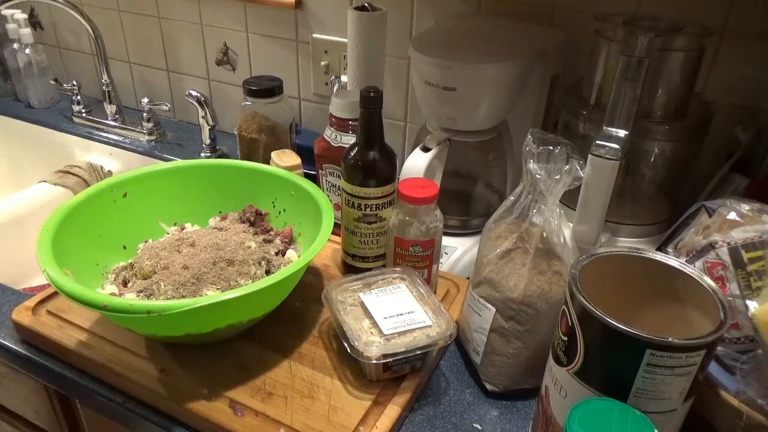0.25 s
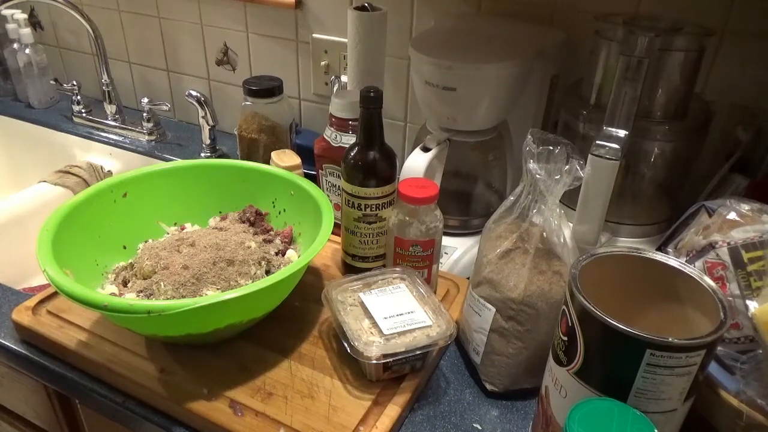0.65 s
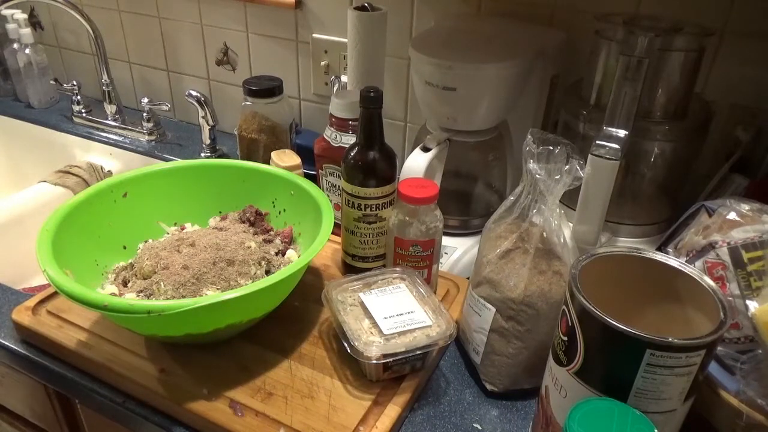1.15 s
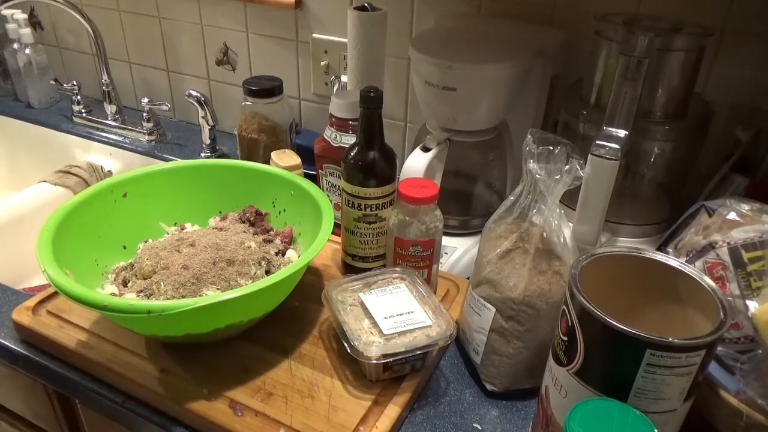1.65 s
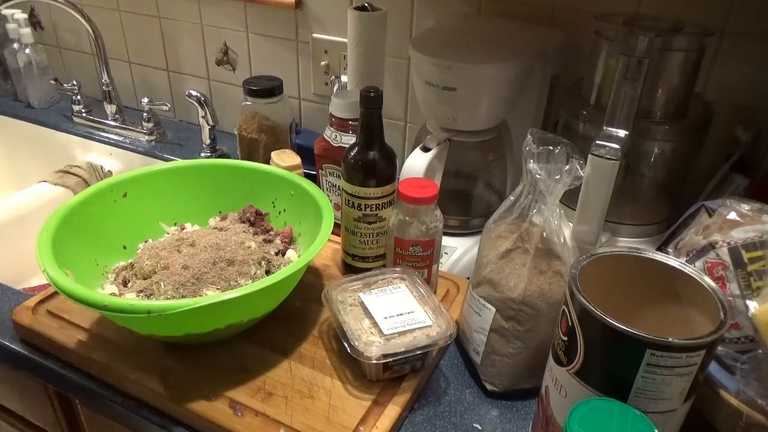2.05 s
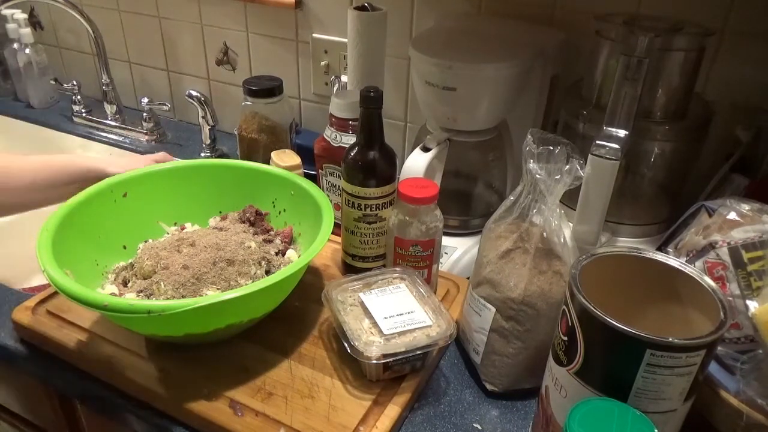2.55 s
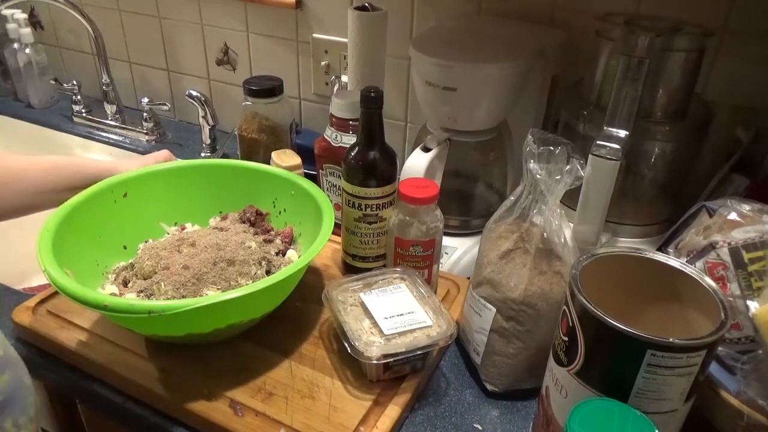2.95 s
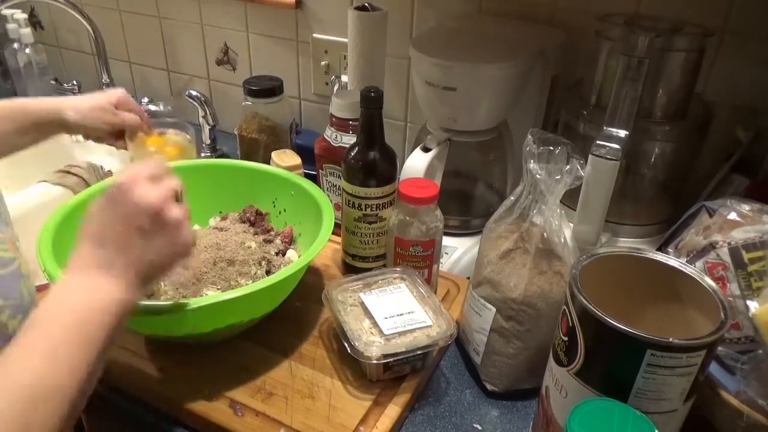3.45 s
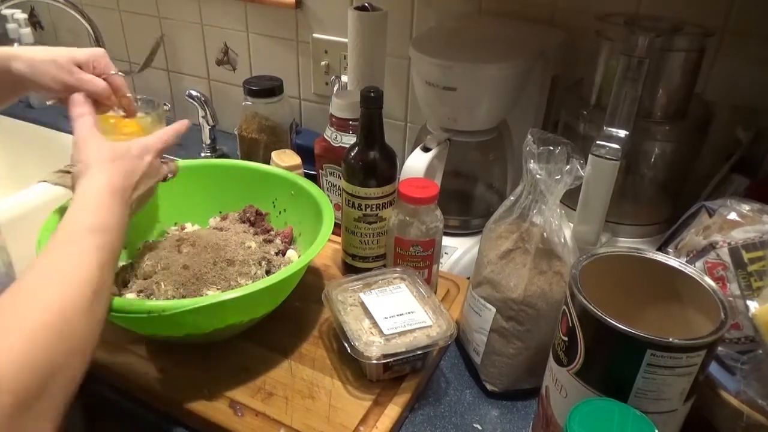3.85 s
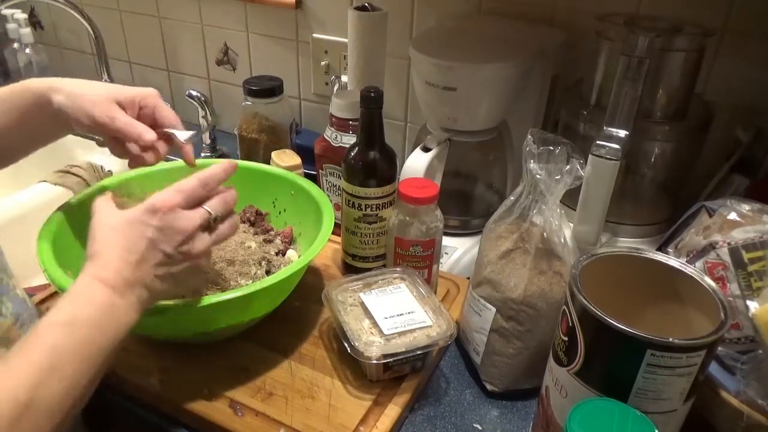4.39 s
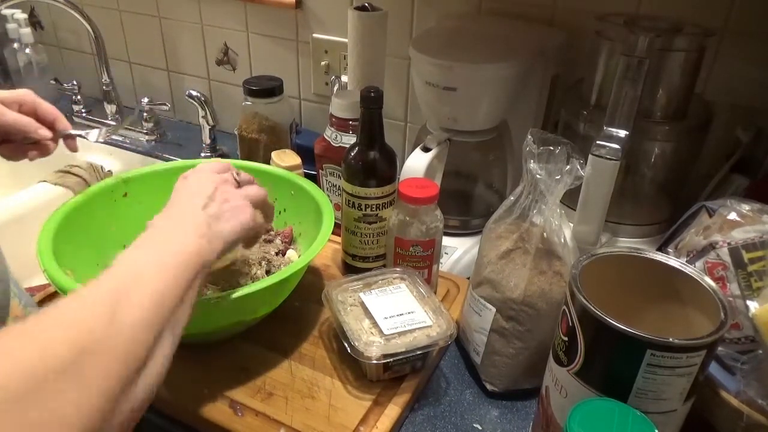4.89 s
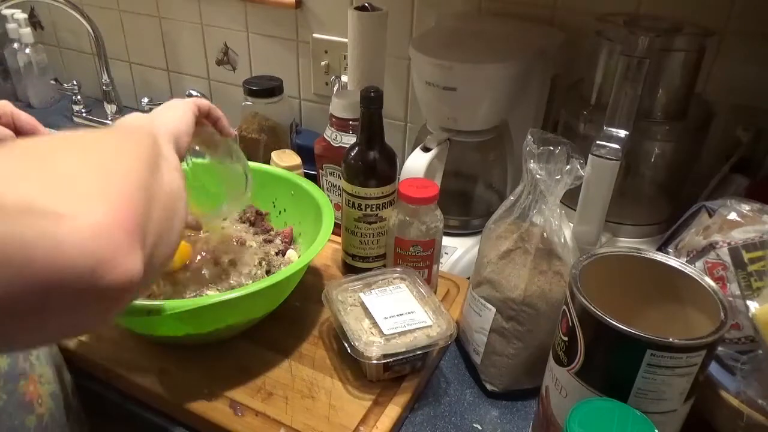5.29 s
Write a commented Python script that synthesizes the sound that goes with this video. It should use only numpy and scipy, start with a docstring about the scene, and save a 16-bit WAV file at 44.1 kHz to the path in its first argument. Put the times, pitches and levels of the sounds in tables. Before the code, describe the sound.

Over a steady appliance hum, a drawer of loose metal scrapes and slams, a bowl is knocked, glass clinks, and eggs plop into the mixture.

```python
"""Drawer and mixing bowl in a kitchen

An appliance hums throughout: shaped noise and a few unsteady tones. Out of sight a drawer rumbles and scrapes
on its runners, made of tiny random contacts; loose metal rattles in it, and it bumps shut.
Things knock against a plastic mixing bowl on a wooden board, and a spoon clinks in a glass dish of eggs:
both are ringing tones plus a noisy tick. The eggs are tipped into the bowl with a wet slap, a swarm of clicks."""
import sys
import numpy as np
from scipy import signal
from scipy.fft import rfft, irfft, next_fast_len
from scipy.io import wavfile
from scipy.ndimage import uniform_filter1d, map_coordinates

SR = 44100
rng = np.random.default_rng(int(sys.argv[2]) if len(sys.argv) > 2 else 0)


def wrap_up_sound(samples):
    """Save the sound to the file named by the first command line argument, as 16-bit audio."""
    columns = np.atleast_2d(samples).T
    # keep every value between -1 and 1, then stretch to whole-number steps
    tamed = np.clip(columns, -1, 1)
    steps = np.round(tamed * 32767).astype(np.int16)
    wavfile.write(sys.argv[1], SR, steps)


N = 243873  # length of the scene [samples]

# In these tables t60 is the time to fade by 60 dB. Spectra give only the balance between frequencies.
# noise of the appliance: (frequency [Hz], level [dB per Hz])
AIR_SPECTRUM = [(12, -58.5), (20, -9), (48, -31), (120, -6), (161, -8.5), (199, -1), (375, -7.5),
                (557, -7.5), (850, -15.5), (920, -10), (996, -19), (1200, -19), (1370, -22.5), (1780, -25),
                (11000, -38), (14300, -101), (22000, -120)]
AIR_DB = -44.78  # level before the sideways sound is added
# tones of the appliance, before their slow growth: (frequency [Hz], level [dB rms])
HUM_TONES = [(59.5, -63), (218, -52.5), (474, -54.5), (942, -53.5)]
# the tones grow a little louder: (time [s], level change [dB])
HUM_GROWTH = [(2.3, -2.5), (3.6, 0)]

# how wide the all-around sound is: (frequency [Hz], side minus middle [dB])
STEREO_WIDTH = [(60, -15), (110, -22), (190, -24.5), (340, -17.5), (600, -12.5), (1060, -6.5), (1880, -6.5),
                (3350, -6), (5950, -3.5), (10600, -11)]
# how long the kitchen echoes: (frequency [Hz], t60 [s])
KITCHEN_DECAY = [(200, 0.32), (550, 0.59), (1400, 0.4), (3700, 0.32), (10000, 0.4)]
TOP_HZ = 11120  # the final sound stops about here

# soft rubs and wet slaps: (time [s], level [dB], hold [s], t60 [s], half the 3 dB treble cutoff [Hz])
SMEAR_EVENTS = [(2.668, -45.5, 0.074, 0.09, 9000), (3.301, -49.5, 0.055, 0.33, 6100),
                (3.411, -46.5, 0.046, 0.071, 9500), (4.214, -58.5, 0.18, .2, 4500),
                (4.729, -47.5, 0.0096, 0.16, 9000), (4.788, -44, 0.0089, 0.17, 9000),
                (4.953, -53, 0.019, .1, 10000), (5.083, -38.5, 0.013, 0.2, 7000),
                (5.363, -30, 0.02, 0.22, 5800)]
# colour of a rub or slap: (frequency [Hz], level [dB per Hz])
SMEAR_SPECTRUM = [(240, -10.5), (400, -7), (506, -11), (580, -2), (659, -17), (747, -0.5), (907, -10.5),
                  (2170, -4.5), (2710, -4.5), (2990, -8.5), (3890, -7), (6870, -16), (11000, -16.5),
                  (14300, -49), (22000, -120)]

# spoon on glass: (time [s], ring peak [dB], strongest frequency [Hz], tick before halving, re ring [dB])
CLINK_EVENTS = [(3.659, -36, 2860, -13), (4.264, -43, 3000, -21), (4.615, -35, 2400, -6.5),
                (4.9822, -20, 3300, -8), (4.987, -20.5, 2470, -4.5), (5.257, -31.5, 2980, -11.5)]
# ringing of the glass dish: (frequency [Hz], level [dB], t60 [s])
GLASS_MODES = [(2380, -17.5, 0.071), (2503, 0, 0.06), (2615, 10, 0.016), (2885, 1, 0.032), (3120, 3, 0.03),
               (3450, -1, 0.05), (3440, -34, 0.073), (5130, 10, .07), (5782, 4, 0.051), (8021, 10, .07)]
# colour of the spoon's tick: (frequency [Hz], level [dB per Hz])
TICK_SPECTRUM = [(1200, -32), (2300, 15), (3500, 3.5), (5500, 2), (8000, -2), (11000, -7)]

# hard contacts on bowl and board: (time [s], first ring peak [dB], strongest frequency [Hz], rebound after [s],
# crack before its 0.57 gain, re first ring [dB], crack t60 [s], crack top frequency [Hz])
KNOCK_EVENTS = [(2.568, -27, 750, .0045, 10, 0.023, 8800), (2.663, -42, 1290, .005, 12.5, 0.13, 10300),
                (2.712, -26, 1040, 0.0051, 5, 0.056, 6800), (2.745, -26.5, 730, 0.0082, -3.5, 0.052, 4030),
                (2.84, -30.5, 900, .005, 3.5, 0.058, 6600), (3.071, -15.5, 980, 0.0034, -1.5, 0.033, 6900),
                (3.1786, -18, 630, 0.00604, -4.5, 0.024, 2240),
                (3.425, -26.5, 1430, 0.00283, -6, 0.021, 9200), (3.447, -32, 1400, .005, -13, 0.044, 9000),
                (3.465, -27, 1100, .005, -8, 0.043, 9100)]
# ringing of the bowl on its board: (frequency [Hz], level [dB], t60 [s])
BOWL_MODES = [(238, -5, 0.04), (290, -0.5, 0.081), (453, 6, 0.062), (522, 0, 0.057), (743, 2, 0.044),
              (900, 13, 0.019), (1080, 8, 0.01), (1367, -11, 0.036), (1450, -0.5, 0.017),
              (2400, -20, 0.018)]
# colour of a hard contact: (frequency [Hz], level [dB per Hz])
CRACK_SPECTRUM = [(100, 2.5), (600, 3), (1400, 3), (2300, 4), (4300, 1), (7000, -7.5), (9700, 1.5),
                  (11200, -0.5)]
REBOUND_DB = 3  # a knock lands twice; the second contact relative to the first
SETTLE_S, SETTLE_DB, SETTLE_HZ = 0.025, -7.5, 267  # then the bowl settles on its board with a lower bump

# brief squeaks of sliding surfaces: (time [s], length [s], frequency [Hz], level before the swell [dB rms])
SQUEAK_EVENTS = [(1.06, 0.049, 7610, -30.5), (1.172, 0.089, 8770, -48), (1.592, .07, 3850, -33),
                 (1.67, 0.048, 3900, -40), (3.41, 0.029, 1480, -38.5), (4.948, 0.041, 8400, -51)]

# the drawer catches, and its load shifts after the stop:
# (time [s], thump peak [dB], clack level before fading [dB rms], clack top frequency [Hz])
BUMP_EVENTS = [(0.718, -50, -32.5, 12000), (0.82, -35, -30, 5000), (0.922, -26, -22.5, 2240),
               (1.021, -36, -27, 1820), (1.28, -32, -35, 3500), (1.322, -45, -24, 7600),
               (1.574, -50, -29, 11100), (1.783, -17, -16, 4500), (1.884, -22.5, -25.5, 2500),
               (1.976, -35, -22.5, 4550), (2.237, -41, -35, 1240)]
# low ringing of the cabinet: (frequency [Hz], level [dB], t60 [s])
CABINET_MODES = [(76, -9, 0.16), (100, -11, 0.16), (235, 4, 0.064), (300.4, 0, 0.054), (434, -4.5, 0.044),
                 (589, -7, 0.046), (1022, -7, 0.1)]
SLAM_S, SLAM_THUMP_DB, SLAM_CLACK_DB, SLAM_TOP_HZ = 1.799, -10.5, -24, 2500  # the drawer hits its stop
SLAM_REPEAT_S, SLAM_LOSS_DB = 0.022, 3  # and chatters against it, weaker each time

# colour of the runners' rumble: (frequency [Hz], level [dB per Hz])
RUMBLE_SPECTRUM = [(21, -41.5), (35, -20), (150, -20.5), (220, -4.5), (292, -4.5), (394, -7.5), (474, -4),
                   (533, -17), (577, -5), (616, -27), (800, -10.5), (1040, -42), (1760, -120)]
# colour of the scraping: (frequency [Hz], level [dB per Hz])
SCRAPE_SPECTRUM = [(320, -24), (550, -5.5), (612, -3), (695, -1), (927, -2.5), (1010, 0.5), (1220, -1),
                   (1330, 1.5), (1700, 3), (1970, -2), (4240, -5.5), (5360, -9.5), (6230, -17),
                   (7000, -18.5), (9100, -23), (15400, -120)]
# colour of the metal's chatter: (frequency [Hz], level [dB per Hz])
CHATTER_SPECTRUM = [(3240, -21), (5500, -11.5), (6200, -4.5), (7020, -8), (7610, -3.5), (9140, -3),
                    (9720, -2), (9890, -2), (10300, -2.5), (10600, 7), (11000, -6.5), (14300, -45),
                    (22000, -120)]
# ringing of the loose metal: (frequency [Hz], width [Hz], level [dB])
METAL_MODES = [(1696, 21, -4.5), (4260, 120, -6), (6170, 26, -2.5), (7570, 105, -5), (9700, 33, -35),
               (10220, 24, 7), (10260, 10.5, 1), (10250, 31, -0.5)]
# jerks of the drawer: (time [s], hold [s], rumble level [dB], scrape level [dB], rattle level [dB])
DRAWER_JERKS = [(-0.012, 0.012, -32.5, -29, -28), (0.192, 0.035, -44, -38.5, -40),
                (0.236, 0.017, -35.5, -27, -29.5), (0.266, 0.029, -33.5, -28.5, -41),
                (0.36, 0.043, -44, -35, -31.5), (0.405, 0.096, -56, -36.5, -26),
                (0.52, 0.063, -44, -31.5, -26.5), (0.706, 0.063, -51, -32.5, -26),
                (0.804, .1, -36, -30.5, -27), (0.923, 0.046, -35, -28.5, -25),
                (0.988, 0.043, -29.5, -29.5, -25.5), (1.039, 0.11, -62, -34, -27),
                (1.325, 0.0045, -40, -30, -49), (1.342, 0.078, -30, -38, -53.5),
                (1.579, .03, -35, -28.5, -30.5), (1.706, 0.08, -53, -38, -45),
                (1.78, 0.032, -20.5, -25, -32), (1.813, 0.11, -34.5, -27.5, -27.5),
                (1.985, 0.034, -43, -42, -37.5), (2.131, 0.011, -64, -46, -43)]
JERK_RISE_S = 0.019  # a jerk takes hold this fast
RUMBLE_T60, SCRAPE_T60, RATTLE_T60 = 0.15, 0.35, 0.3  # dying away after a jerk [s]
# the drawer gliding between jerks: (time [s], rumble level [dB])
DRAWER_GLIDE = [(0.0, -41), (0.45, -50), (0.7, -44), (1.1, -43.5), (1.42, -35.5), (1.72, -35), (2.08, -70),
                (2.28, -53), (2.56, -103)]
# scrape and rattle of a glide whose rumble is at the reference level
GLIDE_REF_DB, GLIDE_SCRAPE_DB, GLIDE_RATTLE_DB = -35.5, -42.5, -61.5
GLIDE_GROWTH = 0.41  # they rise by this many dB for each dB of rumble
JUDDER_DB = -0.06  # a very slight unsteadiness as the slide sticks and slips

AGE = np.arange(SR // 2) / SR  # time since a blow [s]


def amp(db):
    """Turn decibels into gain."""
    return 10 ** (np.asarray(db) / 20)


def unit(x):
    """Scale to an rms level of 1."""
    return x / np.sqrt(np.mean(x ** 2) + 1e-20)


def along(points, hz):
    """Read (Hz, value) points on a logarithmic frequency axis."""
    f, value = np.transpose(points)
    return np.interp(np.log(hz + 1), np.log(f + 1), value)


def wobble(rate):
    """A smooth random curve with this many new random points a second."""
    points = rng.standard_normal(int(N * rate / SR) + 4)
    return map_coordinates(points, [np.arange(N) * rate / SR])


def filtered(x, response):
    """Change each frequency of x by the response."""
    n = x.shape[-1]
    padded = next_fast_len(n + SR // 4)
    spectrum = rfft(x, padded) * response(np.fft.rfftfreq(padded, 1 / SR))
    return irfft(spectrum, padded)[..., :n]


def coloured(x, spectrum):
    """Shape x by a (Hz, dB) spectrum, at rms 1."""
    return unit(filtered(x, lambda hz: amp(along(spectrum, hz))))


def diffuse(pair):
    """Two unrelated signals become sound from all around at two close microphones."""
    middle = pair[0]
    side = filtered(pair[1], lambda hz: amp(along(STEREO_WIDTH, hz)))
    return np.array([middle + side, middle - side])


def add(track, s, sound):
    """Mix a sound into a track at time s."""
    part = track[..., round(s * SR):][..., :sound.shape[-1]]
    part += sound[..., :part.shape[-1]]


def ring(modes, weight=np.ones_like, scatter_db=-1.6):
    """Fading tones struck at slightly new strengths, each building up over about half a cycle; peak 1."""
    hz, db, t60 = np.transpose(modes)
    strength = amp(db + scatter_db * rng.standard_normal(len(hz))) * weight(hz)
    cycles = hz[:, None] * AGE
    build_up = 1 - np.exp(-2 * cycles)
    fade = amp(-60 * AGE / t60[:, None])
    x = strength @ (np.sin(2 * np.pi * cycles) * build_up * fade)
    return x / np.abs(x).max()


def favour(hz, centre_hz, octaves):
    """The place of a contact excites mostly the tones around one frequency."""
    return 1 / (1 + (np.log2(hz / centre_hz) / octaves) ** 2)


def soft(hz, top_hz):
    """A soft contact only weakly excites what lies above its top frequency."""
    return 1 / np.sqrt(1 + (hz / top_hz) ** 6)


def crack(t60, top_hz):
    """The noisy snap of a hard contact; softer contacts are duller."""
    noise = rng.standard_normal(len(AGE))
    snap = filtered(noise, lambda hz: amp(along(CRACK_SPECTRUM, hz)) * soft(hz, top_hz))
    return unit(snap) * amp(-60 * AGE / t60)


def in_kitchen(x, wet_db, pan_db, build_s=0.0028):
    """A short sound with the echo of counter, tiles and walls: noise fading at its own pace per frequency."""
    hz, t, z = signal.stft(rng.standard_normal((2, len(AGE))), SR, nperseg=256)
    fade = amp(-60 * t / along(KITCHEN_DECAY, hz)[:, None])
    tail = signal.istft(z * fade, SR, nperseg=256)[1][:, :len(AGE)]
    tail = tail * (1 - np.exp(-(AGE / build_s) ** 2))
    tail = diffuse(tail / np.linalg.norm(tail[0]))
    echo = signal.fftconvolve(x[None], tail, axes=1)[:, :len(x)]
    direct = x * amp([[pan_db / 2], [-pan_db / 2]])  # positive pan leans left
    return direct + amp(wet_db) * echo


def grains(rate, spread_db, smear):
    """Tiny random contacts of uneven size, rate a second, partly smeared into noise by the room."""
    present = rng.random((2, N)) < rate / SR
    sign = rng.choice([-1, 1], (2, N))
    size = amp(spread_db * rng.standard_normal((2, N)))
    return unit(unit(present * sign * size) + smear * rng.standard_normal((2, N)))


def patchy(x, depth_db):
    """Shifting contact points favour now one band, now another."""
    z = signal.stft(x, nperseg=512)[2]
    field = rng.standard_normal(z.shape[1:])
    field = uniform_filter1d(field, size=5, axis=0)  # smooth over frequency
    field = uniform_filter1d(field, size=8, axis=1)  # smooth over time
    return unit(signal.istft(z * amp(depth_db * unit(field)), nperseg=512)[1][:, :N])


def appliance():
    """A running motor: a soft rush and a few slightly unsteady tones."""
    t = np.arange(N) / SR
    rush = amp(AIR_DB) * diffuse(coloured(rng.standard_normal((2, N)), AIR_SPECTRUM))
    tones = np.zeros(N)
    for hz, db in HUM_TONES:
        level = amp(db + wobble(8)) * np.sqrt(2)  # root 2 turns rms into peak
        tones += level * np.sin(2 * np.pi * hz * t + 0.74 * wobble(20))
    return rush + tones * amp(np.interp(t, *np.transpose(HUM_GROWTH)))


def smears():
    """Rubs and slaps of egg are short swarms of tiny clicks that hold, then die away."""
    out = np.zeros((2, N))
    for s, db, hold, t60, top_hz in SMEAR_EVENTS:
        clicks = grains(rate=1500, spread_db=3, smear=0.6)[0, :len(AGE)]
        swarm = coloured(clicks, SMEAR_SPECTRUM)
        swarm = unit(filtered(swarm, lambda hz: 1 / np.hypot(1, hz / top_hz / 2)))
        rise = 1 - np.exp(-20 * AGE / hold)
        fade = amp(db - 60 * np.maximum(AGE - hold, 0) / t60)
        add(out, s, in_kitchen(swarm * rise * fade, wet_db=-6, pan_db=4.0))
    return out


def clinks():
    """The spoon ticks on the glass dish and rings it, damped by the hand and the eggs."""
    out = np.zeros((2, N))
    for s, db, tone_hz, tick_db in CLINK_EVENTS:
        noise = coloured(rng.standard_normal(len(AGE)), TICK_SPECTRUM)
        tick = 0.5 * noise * amp(tick_db - 60 * AGE / 0.099)
        glass = ring(GLASS_MODES, lambda hz: favour(hz, tone_hz, octaves=0.17))
        add(out, s, in_kitchen(amp(db) * (glass + tick), wet_db=1, pan_db=2))
    return out


def knocks():
    """Each contact cracks and rings the bowl, rebounds once and rocks the bowl on its board."""
    out = np.zeros((2, N))
    for s, db, tone_hz, rebound_s, crack_db, t60, top_hz in KNOCK_EVENTS:
        body = amp(db) * ring(BOWL_MODES, lambda hz: favour(hz, tone_hz, octaves=0.31))
        rebound = ring(BOWL_MODES, lambda hz: favour(hz, tone_hz, octaves=0.29))
        add(body, rebound_s, amp(db + REBOUND_DB) * rebound)
        settling = ring(BOWL_MODES, lambda hz: favour(hz, SETTLE_HZ, octaves=0.41))
        add(body, SETTLE_S, amp(db + SETTLE_DB) * settling)
        snap = 0.57 * amp(db + crack_db) * crack(t60, top_hz)
        add(out, s, in_kitchen(body, wet_db=-7.5, pan_db=1.5))
        add(out, s, in_kitchen(snap, wet_db=0.5, pan_db=3.0))
    return out


def squeaks():
    """A sliding contact briefly locks onto one resonance and sings, rough in pitch."""
    out = np.zeros((2, N))
    for s, length, hz, db in SQUEAK_EVENTS:
        swell = np.sin(np.pi * np.minimum(AGE / length, 1))
        roughness = 1.4 * wobble(350)[:len(AGE)]
        tone = np.sqrt(2) * np.sin(2 * np.pi * hz * AGE + roughness)
        add(out, s, in_kitchen(amp(db) * swell * tone, wet_db=-10, pan_db=0))
    return out


def slam(count):
    """Bumps of the drawer against its stop, evenly spaced and ever weaker."""
    hits = []
    for k in range(count):
        loss_db = k * SLAM_LOSS_DB
        hits.append((SLAM_S + k * SLAM_REPEAT_S, SLAM_THUMP_DB - loss_db, SLAM_CLACK_DB - loss_db, SLAM_TOP_HZ))
    return hits


def bumps():
    """Each bump clacks in the drawer and shakes the cabinet's low tones."""
    out = np.zeros((2, N))
    for s, thump_db, clack_db, top_hz in BUMP_EVENTS + slam(count=3):
        thump = amp(thump_db) * ring(CABINET_MODES)
        clack = amp(clack_db) * crack(t60=0.11, top_hz=top_hz)
        add(out, s, in_kitchen(thump + clack, wet_db=-3.5, pan_db=5.0))
    return out


def burst(s, hold, t60):
    """Power of one jerk: it rises, holds and dies away."""
    age = np.arange(N) / SR - s
    rise = np.clip(age / JERK_RISE_S, 0, 1)
    fade = amp(-60 * np.clip(age - hold, 0, 2 * t60) / t60)
    return (rise * fade) ** 2


def jerk_level(levels_db, t60):
    """Loudness curve of all jerks together; their powers add up."""
    starts, holds = np.transpose(DRAWER_JERKS)[:2]
    power = sum(amp(db) ** 2 * burst(s, hold, t60) for s, hold, db in zip(starts, holds, levels_db))
    return np.sqrt(power)


def metal_response(f):
    """Loose metal passes mostly the frequencies at which it resonates."""
    return sum(amp(db) * 1j * f * width / (centre ** 2 - f ** 2 + 1j * f * width)
               for centre, width, db in METAL_MODES)


def drawer():
    """Runners rumble and scrape; the shaking keeps loose metal chattering in its own resonances."""
    t = np.arange(N) / SR
    glide_db = np.interp(t, *np.transpose(DRAWER_GLIDE))
    moving = t < DRAWER_GLIDE[-1][0]
    friction = amp(GLIDE_GROWTH * (glide_db - GLIDE_REF_DB)) * moving

    # loudness curves: jerks and glide combined
    rumble_db, scrape_db, rattle_db = np.transpose(DRAWER_JERKS)[2:]
    rumbling = np.hypot(jerk_level(rumble_db, RUMBLE_T60), amp(glide_db) * moving)
    scraping = np.hypot(jerk_level(scrape_db, SCRAPE_T60), amp(GLIDE_SCRAPE_DB) * friction)
    shaking = np.hypot(jerk_level(rattle_db, RATTLE_T60), amp(GLIDE_RATTLE_DB) * friction)
    judder = amp(JUDDER_DB * wobble(70))

    rumble = coloured(grains(rate=540, spread_db=1.5, smear=0.88), RUMBLE_SPECTRUM)
    scrape = patchy(coloured(grains(rate=1100, spread_db=2.5, smear=1), SCRAPE_SPECTRUM), depth_db=2.5)
    chatter = patchy(coloured(grains(rate=1600, spread_db=2, smear=1.2), CHATTER_SPECTRUM), depth_db=2)
    ringing = unit(filtered(grains(rate=400, spread_db=3, smear=0.3), metal_response))
    rattle = amp(-2.5) * chatter + amp(-3.5) * ringing
    return diffuse(rumbling * rumble + judder * (scraping * scrape + shaking * rattle))


def scene():
    """All sources together."""
    return appliance() + smears() + clinks() + knocks() + squeaks() + bumps() + drawer()


def record(dry):
    """The microphones lose the deepest bass, and nothing above the top limit is kept."""
    def response(hz):
        bass = hz ** 2 / (hz ** 2 + 25 ** 2)
        treble = np.clip((TOP_HZ - hz) / 200 + 0.5, 0, 1)  # fades out over 200 Hz
        return bass * treble
    return filtered(dry, response)


dry = scene()
out = record(dry)
wrap_up_sound(out)
```